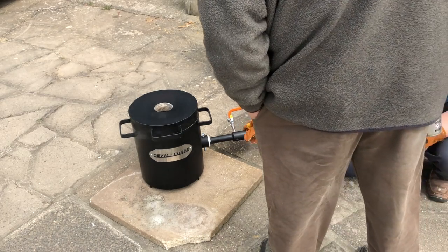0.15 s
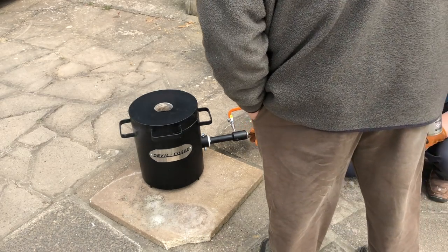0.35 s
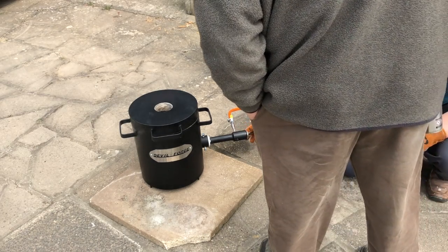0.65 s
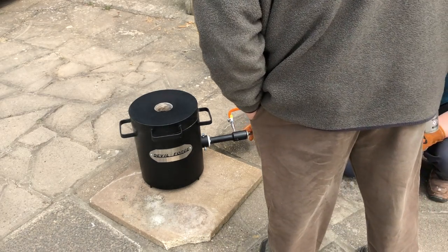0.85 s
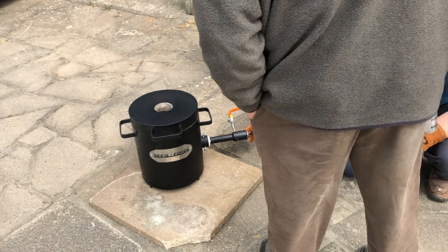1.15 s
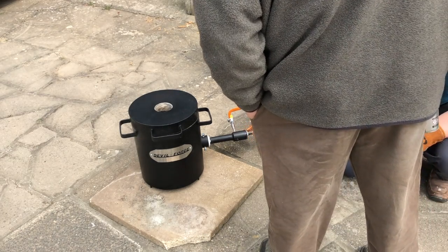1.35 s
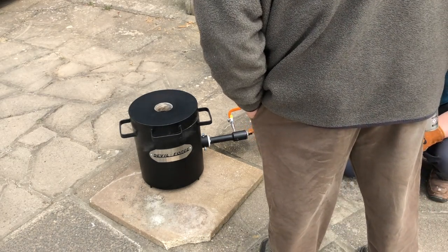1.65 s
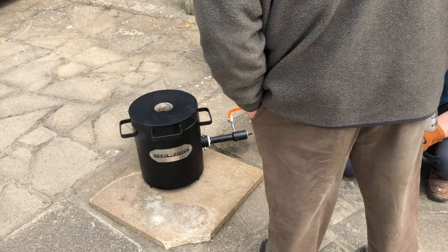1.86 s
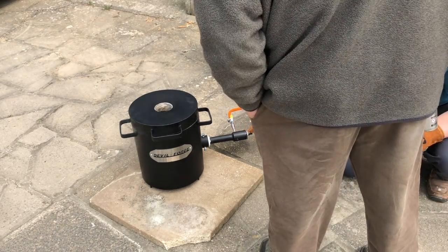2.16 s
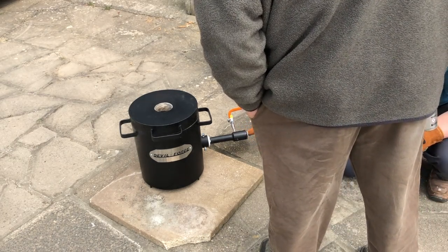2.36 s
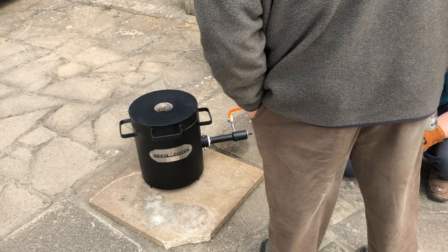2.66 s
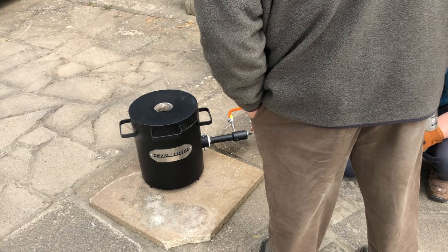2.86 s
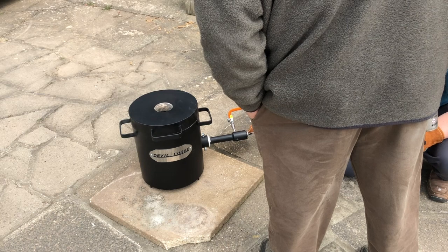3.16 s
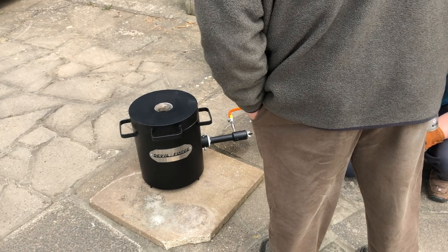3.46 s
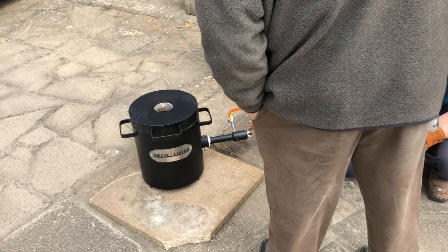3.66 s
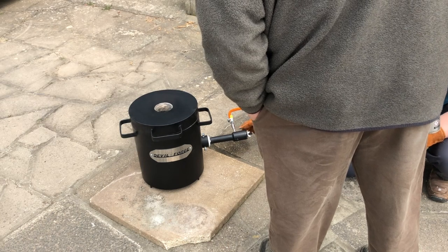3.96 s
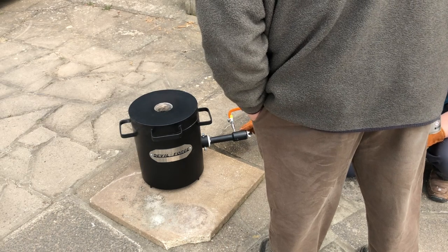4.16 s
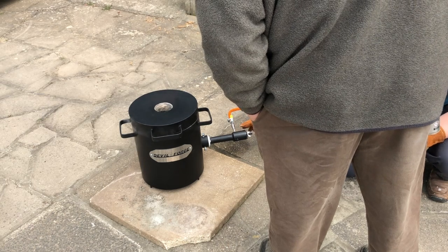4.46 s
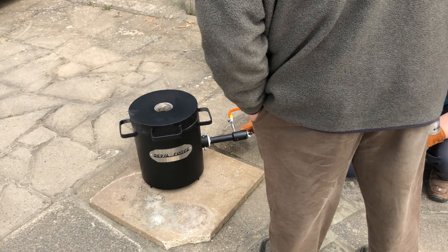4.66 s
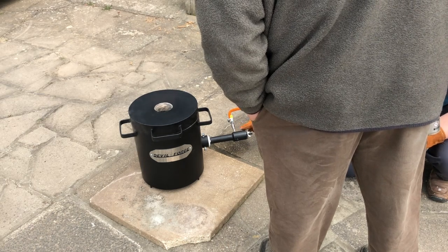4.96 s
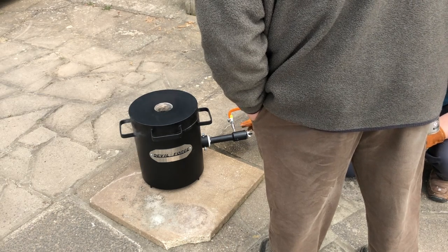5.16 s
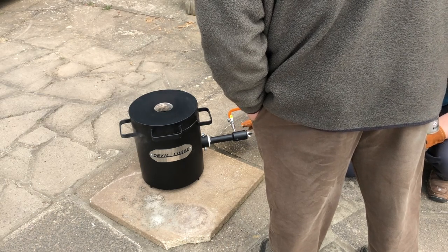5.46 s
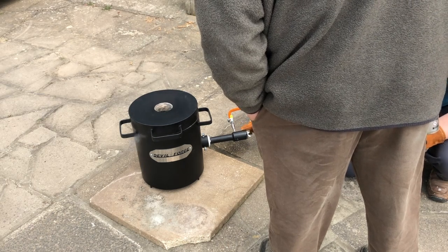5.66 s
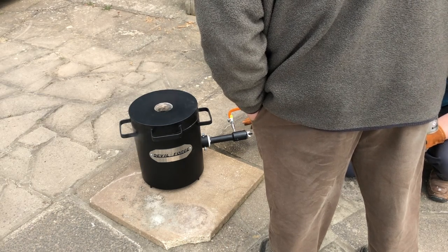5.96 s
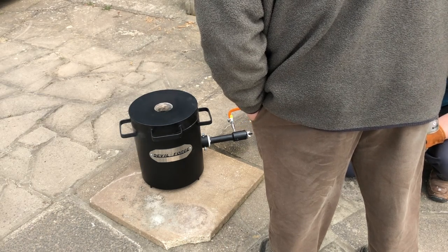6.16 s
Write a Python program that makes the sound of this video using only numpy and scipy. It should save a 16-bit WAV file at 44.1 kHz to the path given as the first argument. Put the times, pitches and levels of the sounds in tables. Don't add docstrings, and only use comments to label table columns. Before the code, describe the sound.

A gas flame roars without pause inside a small steel furnace in a paved yard. A deep chamber rumble dominates, with mid-range flutter and soft pops and a quieter, slightly whistling jet hiss on top. The hiss brightens in the first half second. A double metallic tick comes near 2.5 seconds, and distant birds chirp faintly, mostly after 4 seconds. The microphone is a few steps away, sounding close and dry.

```python
import sys
import numpy as np
from scipy import signal
from scipy.fft import rfft, irfft, next_fast_len
from scipy.io import wavfile
from scipy.ndimage import uniform_filter1d, map_coordinates

SR = 44100
rng = np.random.default_rng(int(sys.argv[2]) if len(sys.argv) > 2 else 0)


def makeup_ratio(level_db):
    decades = np.asarray(level_db, float) / 20
    return 10 ** decades


def wav_out(sig):
    wavfile.write(sys.argv[1], SR, np.round(np.clip(np.atleast_2d(sig).T, -1, 1) * 32767).astype(np.int16))


N = 277830


def unit(x):
    return x / np.sqrt(np.mean(x ** 2) + 1e-20)


def along(points, hz):
    f, v = np.transpose(points)
    return makeup_ratio(np.interp(np.log(hz + 1), np.log(f + 1), v, left=-120, right=-120))


def curves(rows):
    s, *columns = np.transpose(rows)
    return [np.interp(np.arange(N) / SR, s, column) for column in columns]


def wobble(knots_per_s):
    knots = rng.standard_normal(int(N * knots_per_s / SR) + 4)
    return map_coordinates(knots, [np.arange(N) * knots_per_s / SR])


def modes(rows, hz):
    return np.sqrt(sum(makeup_ratio(db) ** 2 / (1 + (2 * (hz - centre) / width) ** 2) ** 2
                       for centre, width, db in rows))


def coloured(x, gain):
    m = 2 * next_fast_len(N // 2 + 4096)
    cepstrum = irfft(np.log(gain(np.fft.rfftfreq(m, 1 / SR)) + 1e-6), m)
    cepstrum[1:m // 2] *= 2
    cepstrum[m // 2 + 1:] = 0
    lead = 4096
    y = irfft(rfft(np.r_[x[:lead][::-1], x], m) * np.exp(rfft(cepstrum)), m)
    return unit(y[lead:lead + N])


def patchy(patchy_db, drift_db=0):
    z = signal.stft(rng.standard_normal(N), nperseg=512)[2]

    def field(bins, frames):
        across_hz = uniform_filter1d(rng.standard_normal(z.shape), size=bins, axis=0)
        return unit(uniform_filter1d(across_hz, size=frames, axis=1))

    gain_db = patchy_db * field(bins=5, frames=8)
    if drift_db:
        gain_db = gain_db + drift_db * field(bins=4, frames=90)
    return unit(signal.istft(z * makeup_ratio(gain_db), nperseg=512)[1][:N])


def struck(events, spectrum, trim_db):
    blows = np.zeros(N)
    for s, db, *_ in events:
        blows[round(s * SR)] = makeup_ratio(db + trim_db)
    y = coloured(blows, lambda hz: along(spectrum, hz))
    return y * blows.max() / np.abs(y).max()


# start_s [s], level_db [dB]
FLAME_STRENGTH = [(0, -53), (.2, -46), (.45, -47), (.78, -43.5), (1.0, -45.5), (1.17, -41.5), (1.28, -45.5),
                  (1.44, -40), (1.6, -46.5), (2.14, -44.5), (2.3, -41), (3.05, -40), (3.35, -45.5),
                  (3.6, -43.5), (4.2, -43.5), (5.6, -40), (5.95, -44.5), (6.2, -42.5)]


def flame_strength():
    strength_db, = curves(FLAME_STRENGTH)
    return strength_db, strength_db - strength_db.mean()


# centre_s [s], swing_db [dB], width_s [s]
CHAMBER_SURGES = [(.09, -5, 0.061), (.2, -7.5, 0.045), (.55, 3, .1), (1.05, -6.5, 0.021), (1.11, 3, 0.048),
                  (1.26, -13, 0.017), (1.95, 3.5, 0.39), (2.25, -0.5, 0.25), (2.801, 8, 0.012),
                  (3.16, -11.5, 0.015), (3.31, 4.5, 0.11), (3.46, 7, 0.037), (4.22, -1, .12),
                  (4.55, 6.5, 0.039), (4.8, -1, .1), (6.2, 2.5, 0.45)]


def chamber_surge():
    t = np.arange(0, N, 10) / SR
    surge_db = sum(db * np.exp(-((t - s) / width) ** 2) for s, db, width in CHAMBER_SURGES)
    return np.repeat(surge_db, 10)[:N]


# frequency_hz [Hz], level_db [dB per Hz]
CHAMBER_COLOUR = [(50, -33.5), (85, -13.5), (129, 1.5), (177, 0), (211, 1.5), (233, -1.5), (312, -15.5),
                  (350, -14), (392, -28.5), (450, -24.5), (580, -58.5)]


def chamber_rumble(turbulence, swing_db, surge_db):
    stir = makeup_ratio(1.3 * turbulence + 0.75 * wobble(25)) * rng.standard_normal(N)
    rumble_db = -25 + 0.51 * swing_db + surge_db
    return makeup_ratio(rumble_db) * coloured(stir, lambda hz: along(CHAMBER_COLOUR, hz))


# frequency_hz [Hz], level_db [dB per Hz]
FLUTTER_COLOUR = [(200, -64), (330, -8.5), (500, -3), (640, 2.5), (800, -3), (970, -7), (1150, -14),
                  (1380, -13.5), (2000, -21.5), (3000, -35), (5000, -43.5)]


def flame_flutter(turbulence, strength_db, swing_db, surge_db):
    puffs_per_s = 500
    chance, size = rng.random(N), rng.random(N)
    puffs = unit((chance < puffs_per_s / SR) * makeup_ratio(12 * size))
    stir = makeup_ratio(1.7 * turbulence + 1.16 * wobble(45)) * (0.65 * puffs + 0.69 * patchy(patchy_db=1.3))
    flutter = coloured(stir - stir.mean(), lambda hz: along(FLUTTER_COLOUR, hz))
    bite = signal.sosfilt(signal.butter(2, 920, "high", fs=SR, output="sos"), flutter)
    flutter = flutter + makeup_ratio(-11 + 0.36 * swing_db) * bite
    return makeup_ratio(strength_db + 0.3 * surge_db + 0.12) * flutter


# start_s [s], level_db [dB]
JET_HISS = [(0.0, -57.5), (0.58, -59.5), (0.88, -59), (1.82, -58), (3.61, -59), (4.0, -57), (5.74, -57),
            (6.3, -57.5)]
# start_s [s], settled [0-1]
COLLAR_TRAVEL = [(0, 0), (.2, .15), (.42, 1), (6.3, 1)]
# start_s [s], end_s [s], low_modes_db [dB], bright_mode_db [dB]
TUBE_CHOKES = [
    (1.4, 1.557, -2, 0),
    (2.193, 2.447, -5, -4.5),
]


def jet_state():
    edge_s = 0.055
    (hiss_db,), (settled,) = curves(JET_HISS), curves(COLLAR_TRAVEL)
    low_choke_db, bright_choke_db = np.zeros(N), np.zeros(N)
    for start, end, low_db, bright_db in TUBE_CHOKES:
        corners = [start - edge_s, start, end, end + edge_s]
        choked = np.interp(np.arange(N) / SR, corners, [0, 1, 1, 0])
        low_choke_db += low_db * choked
        bright_choke_db += bright_db * choked
    return hiss_db, 1 - settled, low_choke_db, bright_choke_db


# frequency_hz [Hz], width_hz [Hz], level_db [dB]
LOW_TUBE_MODES = [(1586, 95, 4.5), (2103, 150, -4.5), (2700, 240, -16.5), (3130, 150, -10)]


def low_tube(turbulence, swing_db, hiss_db, unsettled, choke_db):
    drive = makeup_ratio(1.6 * turbulence) * patchy(patchy_db=0.8, drift_db=0.4)
    low = coloured(drive, lambda hz: modes(LOW_TUBE_MODES, hz))
    read_at = np.cumsum(1 - 0.025 * unsettled)
    low = map_coordinates(low, [read_at], mode="mirror")
    return makeup_ratio(hiss_db + 4 + 0.11 * swing_db + choke_db) * low


# frequency_hz [Hz], width_hz [Hz], level_db [dB]
HIGH_TUBE_MODES = [(3770, 110, -10), (4230, 100, -11.5), (4444, 130, -6), (4993, 115, -2.5),
                   (5294, 120, -3.5), (5700, 90, -5.5), (6500, 250, -28.5), (7380, 62, -6),
                   (7500, 60, -20.5), (8060, 120, -11.5), (8740, 140, -20.5), (9400, 150, -30)]
# frequency_hz [Hz], level_db [dB per Hz]
JET_NOISE = [(1000, -63), (2000, -25), (3500, -20.5), (5000, -13), (6500, -8), (7600, -15.5), (9000, -28),
             (10000, -32), (11500, -60)]


def high_tube(turbulence, hiss_db, unsettled):
    drive = makeup_ratio(0.32 * turbulence) * patchy(patchy_db=1.1, drift_db=2.0)
    high = coloured(drive, lambda hz: np.hypot(modes(HIGH_TUBE_MODES, hz), along(JET_NOISE, hz)))
    return makeup_ratio(hiss_db + 1.5 - 3.5 * unsettled) * high


# frequency_hz [Hz], width_hz [Hz], level_db [dB]
BRIGHT_MODE = [(6920, 170, 0)]


def bright_tube(hiss_db, unsettled, choke_db):
    bright_db = hiss_db.mean() - 4 - 7 * unsettled + choke_db + 0.8 * wobble(3)
    return makeup_ratio(bright_db) * coloured(patchy(patchy_db=1.0), lambda hz: modes(BRIGHT_MODE, hz))


# frequency_hz [Hz], width_hz [Hz], level_db [dB]
NOZZLE_MODES = [(10380, 130, -7), (10900, 300, -9.5), (11250, 250, -2), (12700, 170, -16),
                (13250, 170, -13), (14000, 200, -16), (14710, 170, -13), (15350, 250, -13.5)]
# frequency_hz [Hz], level_db [dB per Hz]
NOZZLE_NOISE = [(8500, -40), (10000, -20), (12000, -16), (16500, -16), (18000, -40)]


def nozzle_whistle(turbulence, swing_db, unsettled):
    whistle_db = -71 + 0.15 * swing_db - 1.3 * unsettled + 0.7 * wobble(2.5)
    drive = makeup_ratio(0.4 * turbulence) * patchy(patchy_db=0.7, drift_db=2.5)
    return makeup_ratio(whistle_db) * coloured(
        drive, lambda hz: np.hypot(modes(NOZZLE_MODES, hz), along(NOZZLE_NOISE, hz)))


# frequency_hz [Hz], width_hz [Hz], level_db [dB]
COLLAR_MODE = [(6320, 110, -10)]


def air_collar(unsettled):
    ring = coloured(rng.standard_normal(N), lambda hz: modes(COLLAR_MODE, hz))
    return makeup_ratio(-64.5) * unsettled * ring


# frequency_hz [Hz], level_db [dB per Hz]
OUTDOOR_COLOUR = [(13, -40.5), (25, -20), (45, -10.5), (75, -2), (100, -4), (140, -4), (220, -32.5),
                  (400, -68)]


def outdoors():
    return makeup_ratio(-33.5) * coloured(rng.standard_normal(N), lambda hz: along(OUTDOOR_COLOUR, hz))


# start_s [s], level_db [dB peak]
FLAME_POPS = [(0.211, -36), (0.442, -39), (0.778, -24), (0.825, -25), (0.909, -36.5), (1.35, -31),
              (2.412, -26), (2.775, -34.5), (2.957, -34), (3.001, -25.5), (3.142, -23.5), (3.583, -22),
              (3.653, -37.5), (3.861, -21.5), (4.367, -31.5), (4.915, -37), (5.051, -25)]
# frequency_hz [Hz], level_db [dB per Hz]
PUFF_COLOUR = [(200, -46), (400, -15), (640, 4.5), (1000, -8), (1500, -14), (2500, -42), (4000, -72)]


def flame_pops():
    return -struck(FLAME_POPS, PUFF_COLOUR, trim_db=-5.5)


def note(rise, fall, crest_hz, up, down, round_s):
    t = np.arange(-round(rise * SR), round(fall * SR)) / SR
    sag = np.where(t < 0, up, down) * (np.hypot(t, round_s) - round_s)
    arch = np.clip(np.sin(np.pi * (t + rise) / (rise + fall)), 0, None)
    swell = arch ** 0.65 * makeup_ratio(-120 * np.clip(t, 0, 1))
    return swell * np.sin(2 * np.pi * np.cumsum(crest_hz * (1 - sag)) / SR)


# crest_s [s], rise_s [s], fall_s [s], pitch_hz [Hz at crest], level_db [dB peak]
BIRD_CHIRPS = [
    (1.665, .015, .012, 4120, -68),
    (1.712, .012, .006, 3400, -66),
    (4.039, .018, .022, 3970, -51),
    (4.76, .02, .02, 2620, -64),
    (4.822, .022, .008, 2780, -55),
    (4.88, .024, .022, 2940, -54),
    (4.947, .037, .018, 3010, -56),
    (5.187, .02, .028, 3500, -64),
]
BIRD_SWEEPS = [
    (3.972, .013, .024, 5900, -56.5),
]


def birds():
    out = np.zeros(N)
    for rows, up, down, round_s in [(BIRD_CHIRPS, 5, 8, 0.006), (BIRD_SWEEPS, 46, 21, 0.003)]:
        for s, rise, fall, crest_hz, db in rows:
            sung = note(rise, fall, crest_hz, up, down, round_s)
            out[round((s - rise) * SR):][:len(sung)] += makeup_ratio(db + 4.0) * sung
    out *= makeup_ratio(2.2 * wobble(150))
    t60 = 0.15
    yard = rng.standard_normal(SR // 5) * makeup_ratio(-60 * np.arange(SR // 5) / SR / t60)
    return out + makeup_ratio(-8) * signal.fftconvolve(out, yard / np.linalg.norm(yard))[:N]


# start_s [s], level_db [dB peak], t60_s [s]
VALVE_TICKS = [
    (2.4512, -32, 0.06),
    (2.4637, -36, 0.025),
]
# frequency_hz [Hz], level_db [dB per Hz]
VALVE_COLOUR = [(900, -25), (1500, 2.5), (2300, 2), (2900, -21), (4000, -26), (6500, -11), (9000, -24),
                (11000, -28), (12500, -61)]


def valve():
    shape = np.zeros(N)
    for s, db, t60 in VALVE_TICKS:
        age = np.clip(np.arange(N) / SR - s, 0, 1)
        shape += makeup_ratio(db - 60 * age / t60) * (1 - np.exp(-age / 0.0006))
    rattle = coloured(shape * rng.standard_normal(N), lambda hz: along(VALVE_COLOUR, hz))
    rattle *= makeup_ratio(VALVE_TICKS[0][1] - 0.4) / np.abs(rattle).max()
    return rattle + struck(VALVE_TICKS, VALVE_COLOUR, trim_db=-7)


def scene():
    turbulence = 0.35 * wobble(9) + 0.33 * wobble(18)
    strength_db, swing_db = flame_strength()
    surge_db = chamber_surge()
    flame = chamber_rumble(turbulence, swing_db, surge_db)
    flame = flame + flame_flutter(turbulence, strength_db, swing_db, surge_db)
    hiss_db, unsettled, low_choke_db, bright_choke_db = jet_state()
    jet = low_tube(turbulence, swing_db, hiss_db, unsettled, low_choke_db)
    jet = jet + high_tube(turbulence, hiss_db, unsettled)
    jet = jet + bright_tube(hiss_db, unsettled, bright_choke_db)
    jet = jet + nozzle_whistle(turbulence, swing_db, unsettled) + air_collar(unsettled)
    return (flame + jet + outdoors() + flame_pops() + birds() + valve())[None]


def low_pass(x):
    return signal.sosfilt(signal.butter(12, 15710, fs=SR, output="sos"), x)


def record(dry):
    return low_pass(dry)


dry = scene()
out = record(dry)
wav_out(out)
```